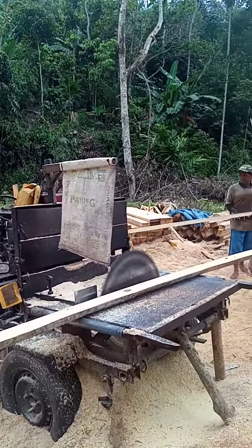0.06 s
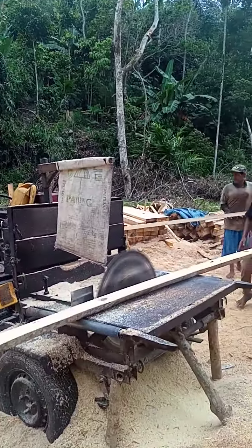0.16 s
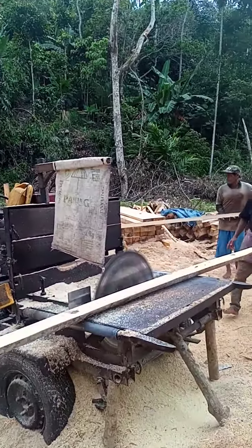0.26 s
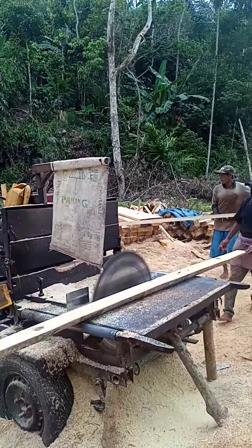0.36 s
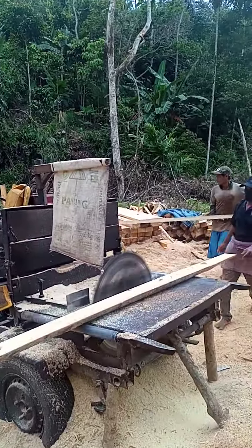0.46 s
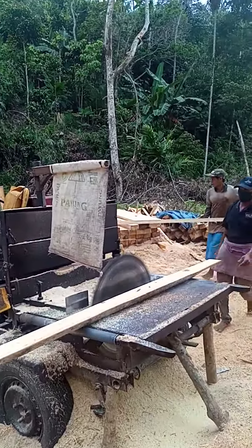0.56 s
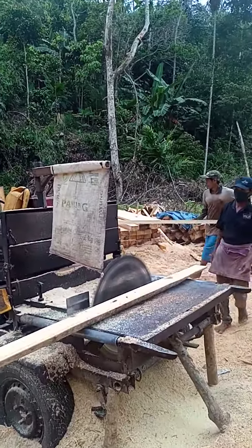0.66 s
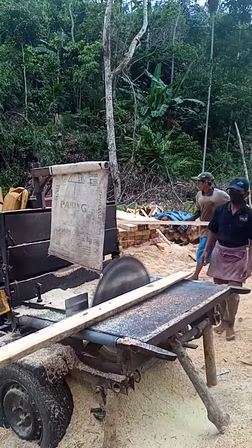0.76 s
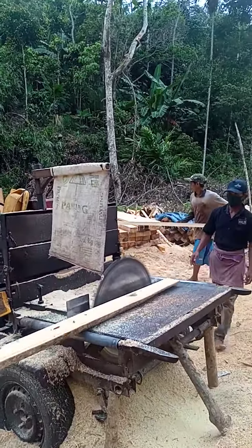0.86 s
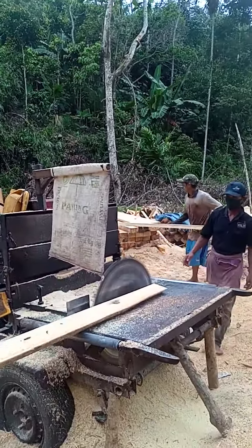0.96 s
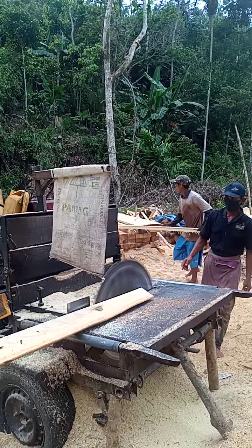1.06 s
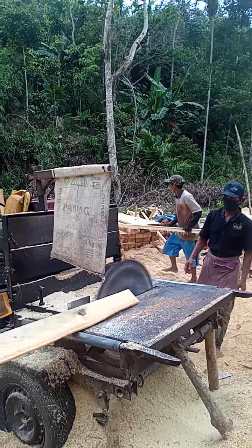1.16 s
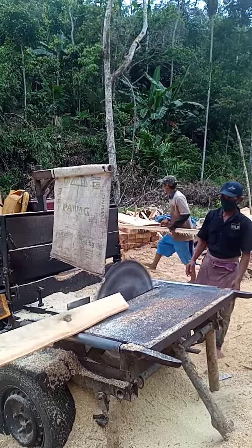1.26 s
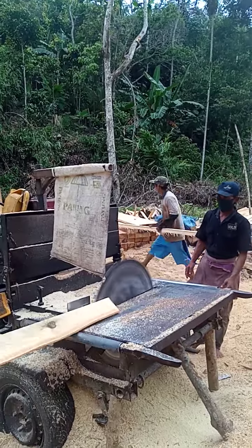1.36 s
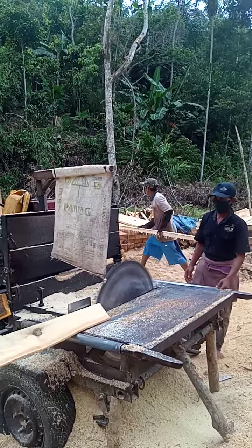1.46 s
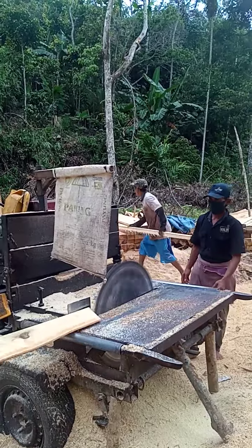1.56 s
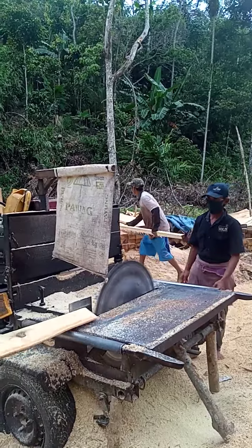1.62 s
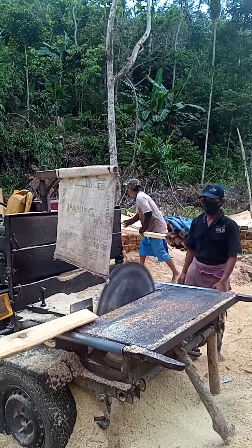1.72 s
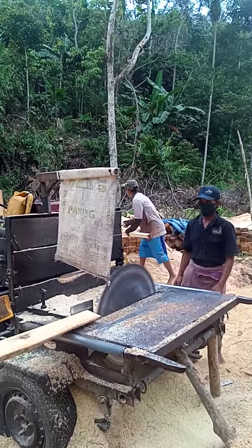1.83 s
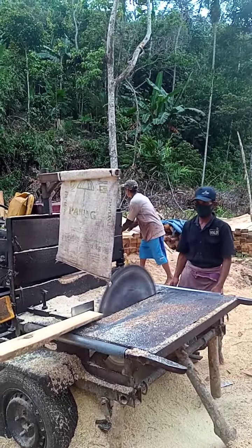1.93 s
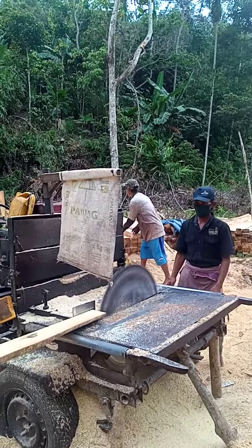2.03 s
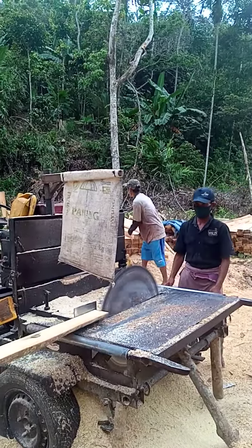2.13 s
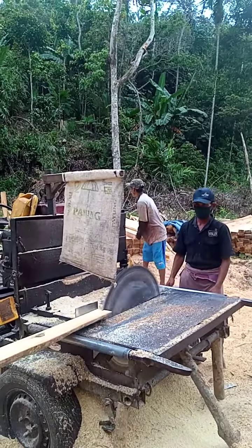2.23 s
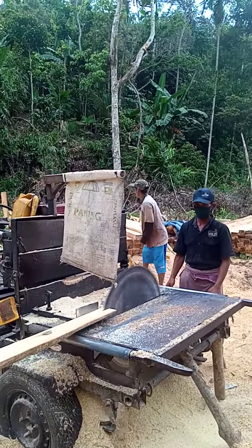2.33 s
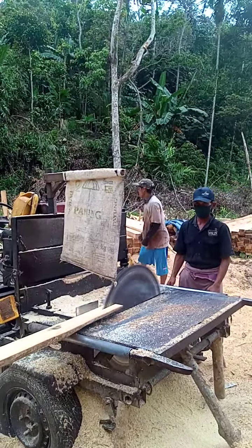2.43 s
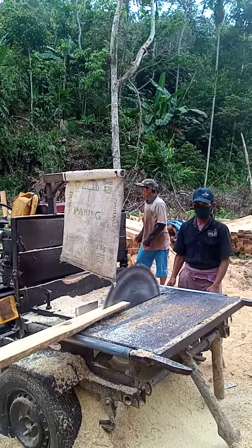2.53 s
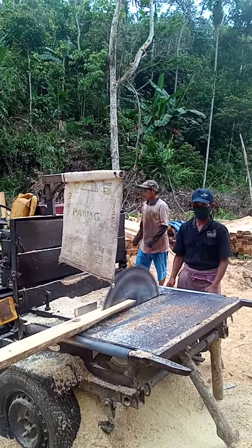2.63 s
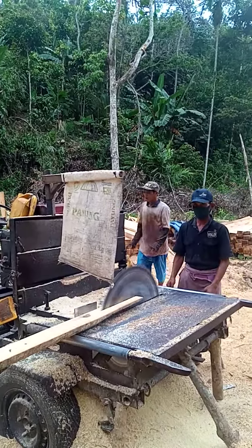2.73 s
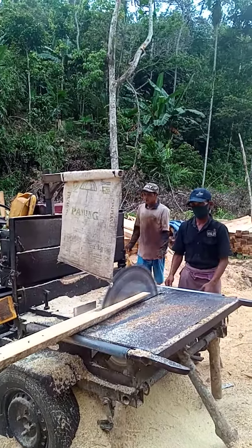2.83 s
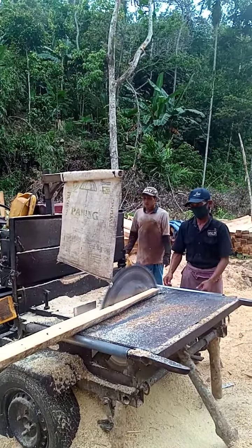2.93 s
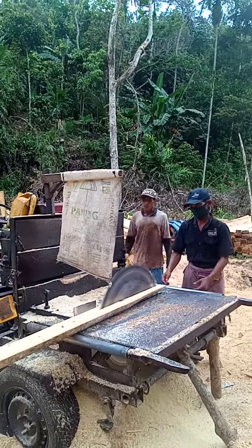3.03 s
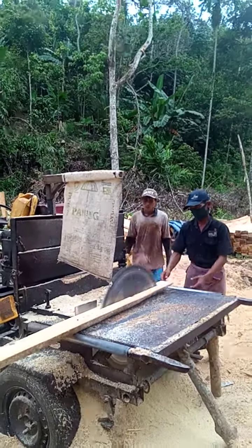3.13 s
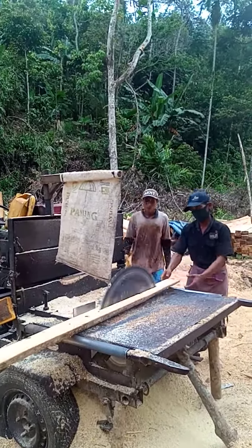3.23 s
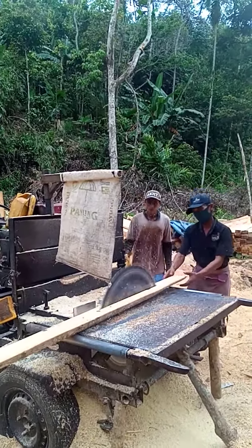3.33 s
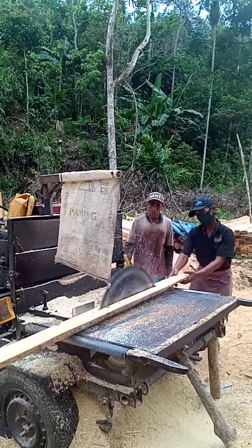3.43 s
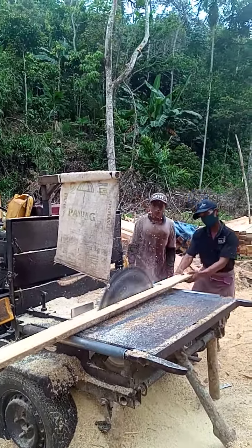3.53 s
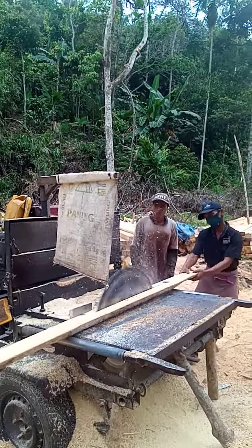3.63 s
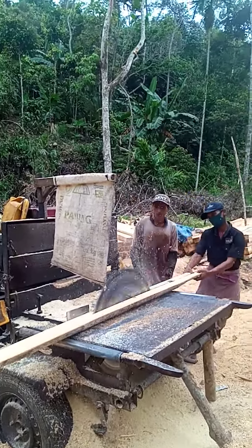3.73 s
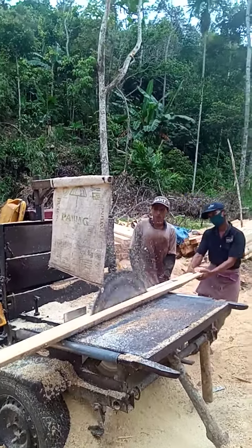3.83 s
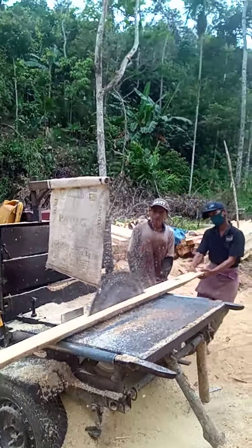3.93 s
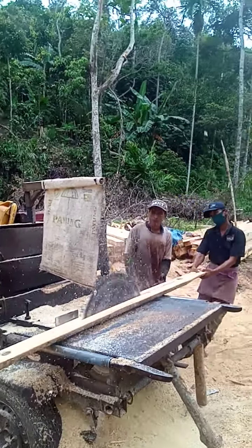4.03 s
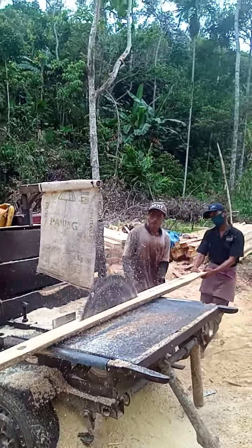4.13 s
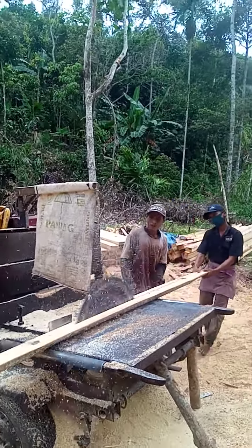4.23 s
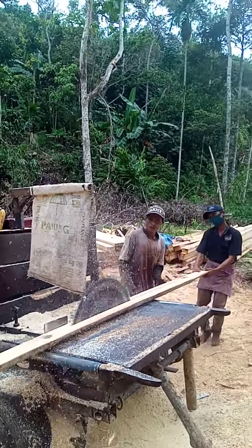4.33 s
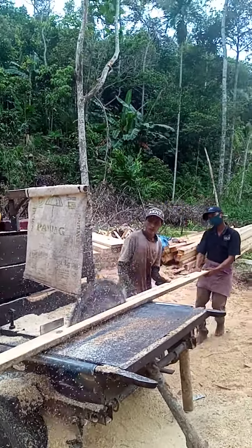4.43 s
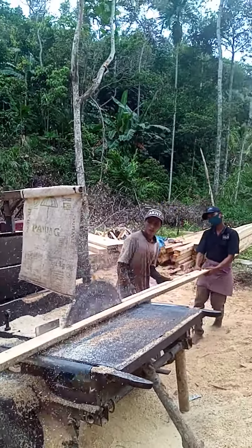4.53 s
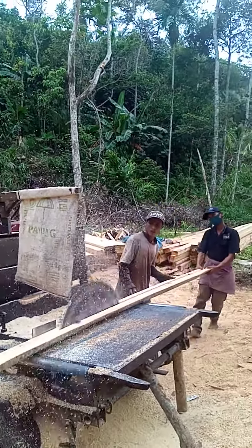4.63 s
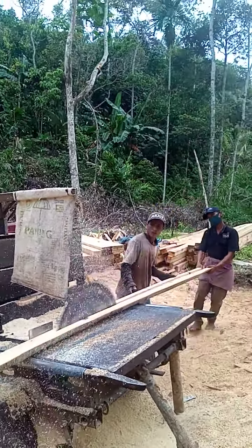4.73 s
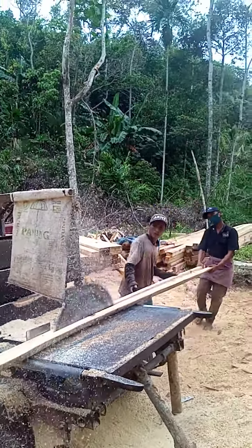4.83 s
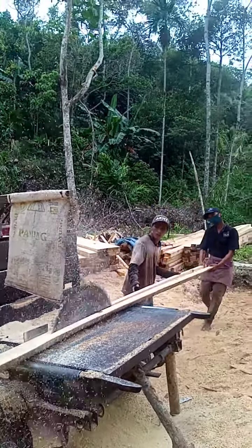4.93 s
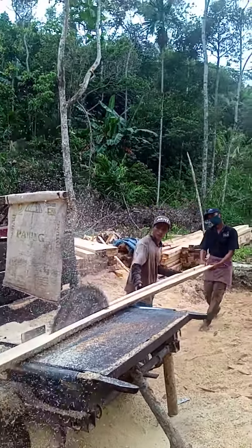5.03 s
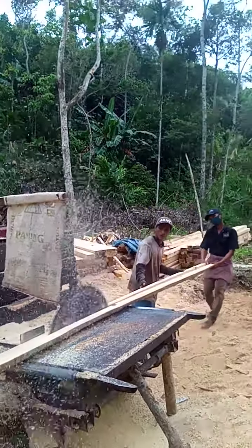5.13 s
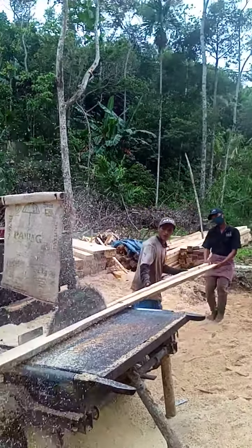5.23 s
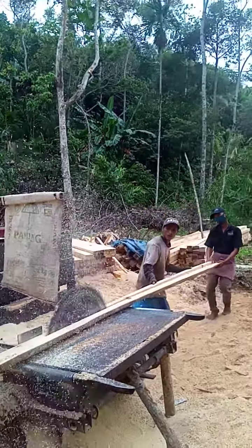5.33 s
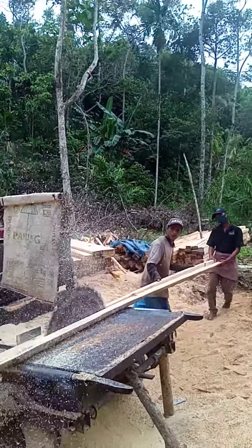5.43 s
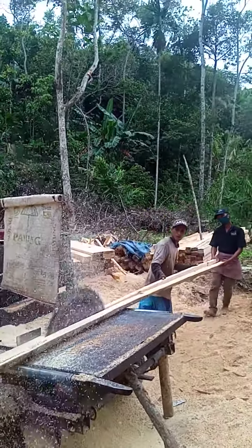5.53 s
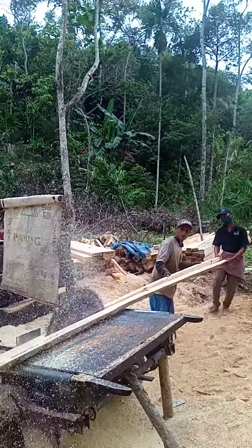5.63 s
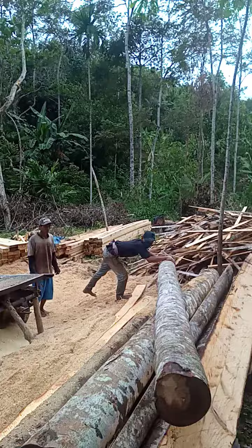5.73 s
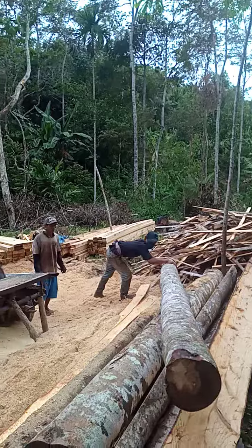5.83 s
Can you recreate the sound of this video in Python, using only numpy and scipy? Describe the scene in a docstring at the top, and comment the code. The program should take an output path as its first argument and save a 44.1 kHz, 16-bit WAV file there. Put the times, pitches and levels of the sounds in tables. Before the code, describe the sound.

A slow single-cylinder diesel engine thumps and clatters close to the microphone at an outdoor sawmill, over a low rumble. In the first 1.7 seconds a plank slides back beside the circular blade, with faint ticks, a few dull thuds and several light, ringing grazes. At about 1.8 seconds the teeth bite into the wood. They rasp, the steel disc rings and chips hiss, all growing louder until about 3.6 seconds, while the engine slows slightly and labours. The deep cut continues with a metallic whine, a slight squeal and small snags, and soft thuds come more often from about 3.8 seconds. At 5.5 seconds the sound drops out briefly, then returns for an instant. From about 5.7 seconds the cutting is gone and the engine runs on more quietly, heard from farther away.

```python
"""A slow single-cylinder diesel thumps and clatters near the microphone, in an outdoor sawmill.
It drives a circular blade. A plank is drawn back, grazes the blade, then is fed in: teeth rasp,
the steel disc rings, chips hiss and the engine labours. Dull thuds come now and then. Near the end
the sound drops out, returns for an instant and jumps to a farther spot, where the engine runs on."""
import sys
import numpy as np
from scipy import signal
from scipy.fft import rfft, irfft, next_fast_len
from scipy.io import wavfile
from scipy.ndimage import uniform_filter1d

SR = 44100
rng = np.random.default_rng(int(sys.argv[2]) if len(sys.argv) > 2 else 0)


def generate_wav(sig):
    """Save sig (samples, or channels by samples) to the path in sys.argv[1] as 16-bit PCM at SR."""
    pcm = np.round(np.clip(np.atleast_2d(sig).T, -1, 1) * 32767).astype(np.int16)
    wavfile.write(sys.argv[1], SR, pcm)


N = 258855
TIME = np.arange(N) / SR
CUT_START_S, SINK_S = 1.83, 1.74  # the teeth meet the plank; time from there to full depth
JUMP_S = 5.685  # from here on the microphone stands farther off

# modes of the steel disc (f/Hz, width/Hz, level/dB)
DISC_MODES = [(1765, 24, -11), (2039, 50, -11), (2520, 45, 0), (2592, 40, 1.5), (2715, 28, -3),
              (2785, 30, -4), (2892, 32, -.5), (3070, 30, -8), (3170, 40, -8)]
# spectrum of teeth rasping in a shallow cut (f/Hz, level/dB)
SHALLOW_RASP = [(530, -48), (900, -28), (1050, -13), (1340, -31), (1600, -17), (2170, -14.5), (2650, -1.5),
                (2930, -8), (3230, -4.5), (3620, -35.5), (4600, -53), (5980, -53), (10100, -120)]
# spectrum of spraying chips (f/Hz, level/dB)
CHIP_SPRAY = [(2530, -19), (4300, -12.5), (4540, -36), (4740, -10.5), (6000, 1.5), (6340, -1.5),
              (6990, -11.5), (7270, -7.5), (7850, -10.5), (9240, -6.5), (10300, -2.5), (11000, -6.5),
              (13000, -39.5), (15100, -27), (15900, -38.5)]


def undb(db):
    """Decibels to gain."""
    return 10 ** (np.asarray(db) / 20)


def unit(x):
    """Scale to rms 1."""
    return x / np.sqrt(np.mean(x ** 2))


def noise():
    """White noise."""
    return rng.standard_normal(N)


def walk(rate):
    """Smooth random drift, about `rate` new values a second, spread near 1."""
    hold = int(SR / rate)
    steps = np.repeat(noise()[:N // hold + 1], hold)
    return 1.2 * uniform_filter1d(steps, hold)[:N]


def swell(s, half_s, db=0):
    """A smooth rise and fall around a moment, as a gain."""
    return undb(db) * np.exp(-((TIME - s) / half_s) ** 2)


def colour(x, spectrum):
    """Filter by (f/Hz, level/dB) points, falling 60 dB an octave beyond the ends; rms 1."""
    hz, db = np.transpose(spectrum)
    size = next_fast_len(N)
    octave = np.log2(np.maximum(np.arange(size // 2 + 1) * SR / size, 1))
    outside = np.abs(octave - np.clip(octave, np.log2(hz[0]), np.log2(hz[-1])))
    gain = undb(np.interp(octave, np.log2(hz), db) - 60 * outside)
    return unit(irfft(rfft(x, size) * gain, size)[:N])


def resonate(x, hz, *widths):
    """Resonances in series at one pitch, one for each width in Hz; gain 1 at the centre."""
    for width in widths:
        x = signal.lfilter(*signal.iirpeak(hz, hz / width, fs=SR), x)
    return x


def ring(x, modes):
    """A bank of modes (f/Hz, width/Hz, level/dB) with trimmed skirts; rms 1."""
    return unit(sum(undb(db) * resonate(x, hz, width, 5 * width) for hz, width, db in modes))


def strokes(turns, place, scatter_db):
    """One impulse of uneven size each time the cycle passes a place."""
    passes = np.diff(np.floor(turns - place), prepend=np.floor(turns[0] - place))
    return passes * undb(scatter_db * np.clip(noise(), -2, 2))


def cut_depth(first_touch=0.13):
    """How deep the blade is in the wood (0-1) at a steady feed."""
    fed = np.clip((TIME - CUT_START_S) / SINK_S, 0, 1)
    return first_touch + (1 - first_touch) * fed


def buried_s():
    """Seconds since the blade reached full depth."""
    return np.maximum(TIME - CUT_START_S - SINK_S, 0)


def air():
    """A faint steady hiss lies behind everything."""
    return noise() * undb(-78.5)


def rumble(far, idle_db=-54, labour_db=2.5, far_db=-8, build_s=0.3):
    """A low rumble sways under the machine and grows while the buried blade labours."""
    # spectrum of the rumble (f/Hz, level/dB)
    spectrum = [(25, -20), (48, -3), (72, -1.5), (105, -1), (165, -12.5), (200, -14), (235, -5), (330, -8),
                (430, -15.5), (600, -18), (900, -15.5), (1100, -44)]
    labour = np.clip(buried_s() / build_s, 0, 1)
    sway_db = 1.3 * walk(9)
    return colour(noise(), spectrum) * undb(idle_db + labour_db * labour + far_db * far + sway_db)


def thuds(rise_s=0.0025, rough=0.22, stiffen=0.7, relax_s=0.0056, low_cut_hz=30):
    """Soft heavy blows: a low, slightly rough damped swing, higher while the contact is stiff."""
    # the blows (t/s, relative level/dB, f/Hz, t60/s)
    blows = [(0.225, -31, 91, 0.13), (0.527, -28.5, 88, 0.06), (.783, -35.5, 92, 0.083),
             (2.538, -34, 81, 0.045), (3.79, -42.5, 59.6, 0.21), (3.85, -32, 93, 0.073),
             (4.004, -35.5, 91, 0.16), (4.061, -24.5, 102, 0.032), (4.5, -31.5, 91, 0.078),
             (4.743, -36, 96, 0.058), (4.87, -41.5, 56, .15), (5.049, -27, 103, 0.057),
             (5.12, -42, 65, .13), (5.175, -38.5, 90, 0.099), (5.409, -36.5, 88, 0.11),
             (5.446, -32, 72, 0.065), (5.677, -43.5, 65, 0.13)]
    out = np.zeros(N)
    shake = unit(resonate(noise(), 130, 150, 150))
    for s, db, hz, t60 in blows:
        age = np.clip(TIME - s, 0, 1)
        cycles = hz * (age + stiffen * relax_s * (1 - np.exp(-age / relax_s)))
        swing = np.sin(2 * np.pi * cycles) + rough * shake
        envelope = (1 - np.exp(-age / rise_s)) * np.exp(-np.log(1000) * age / t60)
        out += 1.6 * undb(db) * swing * envelope
    return signal.sosfilt(signal.butter(2, low_cut_hz, "high", fs=SR, output="sos"), out)


def ticks(per_s=70):
    """The free teeth tick finely while the plank slides back beside the blade."""
    flecks = (rng.random(N) < per_s / SR) * undb(4 * np.clip(noise(), -1.5, 1.5))
    return ring(flecks, [(6150, 300, -4), (10000, 410, 1)]) * swell(0.53, half_s=0.38, db=-66.5)


def grazes(rasp_db=12, hiss_db=2.0, flutter_db=3.0, ring_s=0.03):
    """The side of the blade brushes the plank, and the disc rings on a moment."""
    # the touches (t/s, half length/s, relative level/dB)
    touches = [(0.515, .09, -65.5), (.77, .025, -64), (1.321, 0.053, -58), (1.428, 0.023, -59),
               (1.695, 0.028, -68.5)]
    touch = sum(swell(s, half_s, db) for s, half_s, db in touches)
    pole = np.exp(-1 / (ring_s * SR))
    ringing = signal.lfilter([1 - pole], [1, -pole], touch)
    hiss = touch * undb(hiss_db + flutter_db * walk(120)) * colour(noise(), CHIP_SPRAY)
    rasp = colour(noise(), SHALLOW_RASP) + ring(noise(), DISC_MODES)
    return hiss + ringing * undb(rasp_db) * rasp


def intake(turns, load, hz=734, width_hz=70, place=0.11, half_length=0.16, idle_db=-60, load_db=3):
    """Once a cycle the engine draws air and the intake pipe hoots."""
    since = (turns - place + .5) % 1 - .5
    draw = np.exp(-(since / half_length) ** 2) + 0.14
    breath = unit(resonate(noise(), hz, width_hz, width_hz))
    wavering_hz = hz + 7 * walk(40)
    hoot = np.sqrt(2) * np.sin(2 * np.pi * np.cumsum(wavering_hz) / SR)
    return unit(draw * (0.37 * breath + hoot)) * undb(idle_db + load_db * load)


def exhaust(turns, load, trim_db=-12.5):
    """Gas pulses boom briefly in the silencer; under load the two strongest even out."""
    # pulses of one cycle (place/cycles, f/Hz, width/Hz, idle level/dB, loaded level/dB), before the trim
    pulses = [(.44, 286, 150, -40, -43.5), (.735, 255.3, 144, -44.5, -44.5), (0.1, 210, 180, -56, -57.5)]
    out = 0
    for place, hz, width, idle_db, loaded_db in pulses:
        puffs = strokes(turns, place, scatter_db=-0.5)
        boom = resonate(puffs, hz, width, width, 0.91 * width)
        out += unit(boom) * undb(idle_db + (loaded_db - idle_db) * load + trim_db)
    return out


def clatter(turns, near_db=-45, decay_s=0.014, whirr=0.91, grain_db=1.05, disc_db=-7):
    """Combustion knock and valve gear rattle over the belt's whirr; the shaking makes the blade sing."""
    # knocks of one cycle (place/cycles, relative strength)
    knocks = [(.91, 1), (0.2, 0.47), (0.6, 0.28), (.37, 0.39)]
    # spectrum of the rattling metal (f/Hz, level/dB)
    spectrum = [(500, -17), (850, -12.5), (961, -15), (1180, -7.5), (1480, -16), (1650, -7), (2050, -6),
                (2690, 2), (3650, -24.5), (4960, -32.5), (5890, -23.5), (6900, -35), (10200, -24),
                (12100, -44), (15900, -60)]
    hits = sum(size * strokes(turns, place, scatter_db=2.5) for place, size in knocks)
    bursts = signal.lfilter([1], [1, -np.exp(-1 / (decay_s * SR))], hits)
    shaking = (whirr + bursts) * undb(grain_db * walk(300))
    rattle = colour(shaking * noise(), spectrum)
    singing = undb(disc_db) * ring(shaking * noise(), DISC_MODES)
    return unit(rattle + singing) * undb(near_db + .5 * walk(12))


def teeth(turns, per_cycle=58, scatter_db=3.0, grit=0.048):
    """Teeth tear fibres of uneven strength, and splinters crackle between the bites."""
    bites = strokes(turns * per_cycle + .25 * walk(250), 0, scatter_db)
    splinters = grit * noise() * undb(2.7 * walk(980))
    return unit(bites - bites.mean() + splinters)


def cutting_hiss(entry, rim, depth, grip, grain_db):
    """Chips spray and the disc rings high; tooth tips zing in a shallow cut and whistle half sunk."""
    # high modes of the disc (f/Hz, width/Hz, level/dB)
    high_modes = [(4850, 100, -6), (5598, 70, -1), (5850, 60, -2), (6154, 60, 5), (6440, 60, -3),
                  (7013, 40, -6), (7450, 100, -5), (8179, 50, -7), (8347, 65, -3), (9200, 90, -5),
                  (10304, 200, -2)]
    # whistling modes of the tooth tips (f/Hz, width/Hz, level/dB)
    tip_modes = [(8400, 450, -4), (10100, 500, 1.5)]
    half_sunk = 1 - (2 * depth - 1) ** 2
    chips = noise() * undb(0.82 * grain_db + walk(1500))
    spray = colour(chips, CHIP_SPRAY) * undb(-3 * (1 - depth))
    overtones = undb(-2) * grip * ring(rim, high_modes)
    zing = undb(-7) * (1 - depth) * ring(entry, [(5600, 170, -1), (5900, 223, 0), (6090, 130, 0)])
    whistle = undb(-8) * half_sunk * ring(rim, tip_modes)
    fine_chips = colour(noise(), [(8000, -4), (11500, -6), (12200, -8), (13200, -18), (15500, -28)])
    sizzle = fine_chips * (undb(-18.5) + undb(-14.5) * half_sunk)
    return unit(spray + overtones + zing + whistle + sizzle)


def saw(turns, depth, deep_ring_db=-31.5, deep_hiss_db=-41.5, plank_db=-57, rise_s=.04):
    """Tooth strikes ring the disc and the plank, and chips hiss; all grow as the blade sinks in."""
    # the teeth catch in hard wood or run slack (t/s, half length/s, ring change/dB, hiss change/dB)
    snags = [(2.234, .02, -1, 2.5), (2.42, .015, 3, 2), (2.508, 0.022, -3, -0.5), (2.61, 0.014, -3.5, -1.5),
             (2.764, 0.06, 4, 1), (3.73, 0.018, 0.5, 2), (3.779, 0.012, 2.5, -1), (4.23, 0.014, 3.5, -1),
             (4.447, 0.061, 2, 1.5), (4.5, 0.0098, -8, -0.5), (5.154, .025, 2.5, .5), (5.411, 0.013, 5, 2)]
    # spectrum of teeth rasping in a deep cut (f/Hz, level/dB)
    deep_rasp = [(500, -40), (850, -36), (932, -27), (1030, -11), (1350, -33), (1490, -14.5), (1630, -19),
                 (2030, -8.5), (2210, -7), (2600, 5.5), (3210, -4.5), (3700, -21), (4600, -25), (5980, -65),
                 (10100, -120)]
    # spectrum of the plank's body (f/Hz, level/dB)
    plank_body = [(300, 5), (420, -8), (495, 5), (600, -13), (800, -3.5), (1050, -9.5), (1300, -2)]
    ring_db = deep_ring_db - 13.5 * (1 - depth) - 0.64 * buried_s()  # eases once the blade is buried
    hiss_db = deep_hiss_db + 2 * np.log2(depth)
    for s, half_s, more_ring_db, more_hiss_db in snags:
        snag = swell(s, half_s)
        ring_db += more_ring_db * snag
        hiss_db += more_hiss_db * snag
    grain_db = .5 * walk(45) + .5 * walk(170)  # hard and soft wood passes the teeth
    entry, inside, rim = ((teeth(turns) + 1.1 * noise()) * undb(grain_db) for _ in range(3))
    rasp = np.sqrt(1 - depth) * colour(entry, SHALLOW_RASP) + np.sqrt(depth) * colour(inside, deep_rasp)
    grip = 0.3 + 0.5 * depth  # a buried blade rings harder
    squeal = swell(3.75, half_s=0.95, db=-15.5) * ring(noise(), DISC_MODES[1:2])  # the plank binds
    disc = unit(rasp + grip * ring(rim, DISC_MODES)) + squeal
    hiss = cutting_hiss(entry, rim, depth, grip, grain_db)
    plank = colour(inside, plank_body) * depth * undb(plank_db)
    contact = np.clip((TIME - CUT_START_S) / rise_s, 0, 1) ** 2 * (TIME < JUMP_S)
    push_db = 0.37 * walk(22)  # the hand feed is uneven
    return contact * (disc * undb(ring_db + push_db) + hiss * undb(hiss_db) + plank)


def scene():
    """Engine and saw share one shaft; at the farther spot the engine is quieter and no cut is heard."""
    # engine speed, sagging under load (t/s, firing rate/Hz)
    firing_rate = [(0, 12.933), (2.1, 12.98), (2.75, 12.388), (3.3, 12.496), (3.7, 12.278), (4.05, 12.47),
                   (4.6, 12.277), (5.5, 12.184)]
    speed = np.interp(TIME, *np.transpose(firing_rate))
    turns = .178 + np.cumsum(speed) / SR  # engine cycles, starting partway through one
    far = TIME >= JUMP_S
    depth = cut_depth()
    load = np.where(far, .4, depth)
    engine = (exhaust(turns, load) * undb(-11 * far)
              + intake(turns, load) * undb(-7 * far)
              + clatter(turns) * undb(-11.5 * far))
    return (air() + engine + rumble(far) + saw(turns, depth) + grazes() + ticks() + thuds())[None]


def record(dry, drop_s=5.53, return_s=5.644, top_hz=15800):
    """One microphone channel: the sound drops out briefly, and the highest treble is cut."""
    live = uniform_filter1d(1. * ((TIME < drop_s) | (TIME > return_s)), size=40)
    return signal.sosfilt(signal.ellip(10, .2, 70, top_hz, fs=SR, output="sos"), dry * live)


dry = scene()
out = record(dry)
generate_wav(out)
```